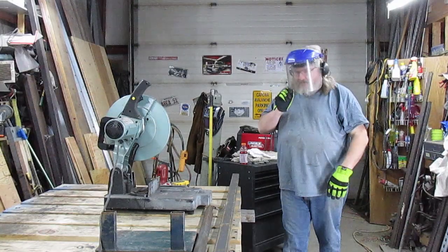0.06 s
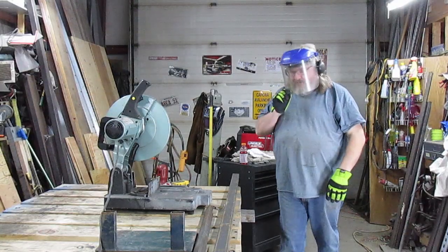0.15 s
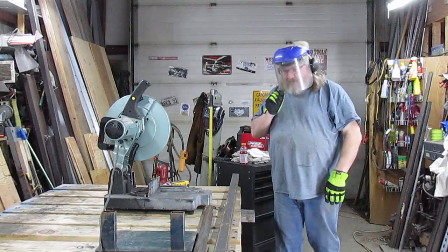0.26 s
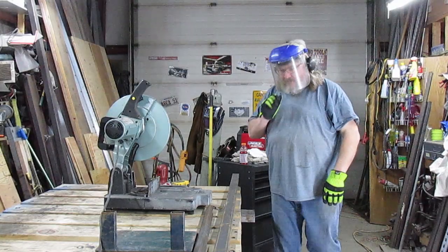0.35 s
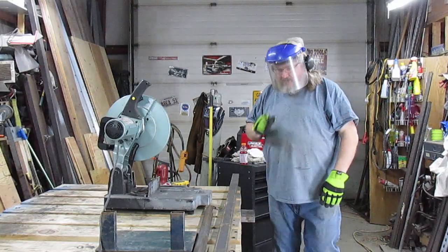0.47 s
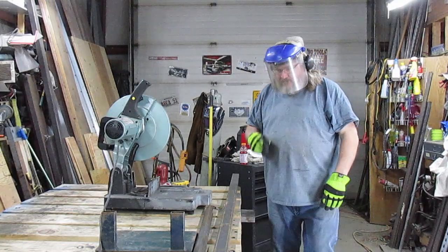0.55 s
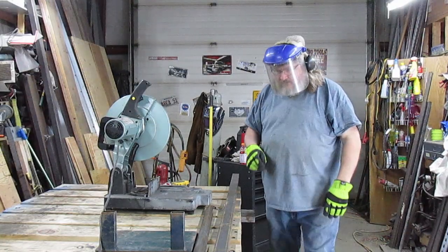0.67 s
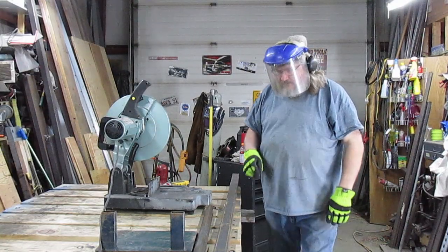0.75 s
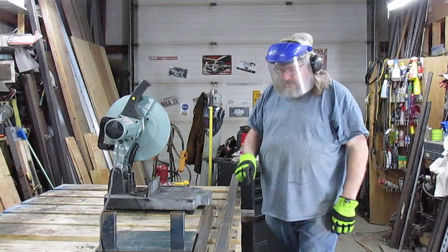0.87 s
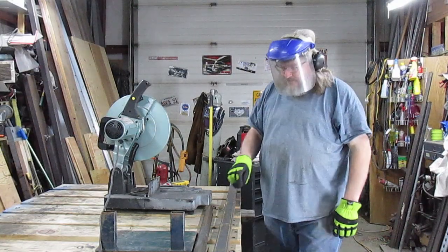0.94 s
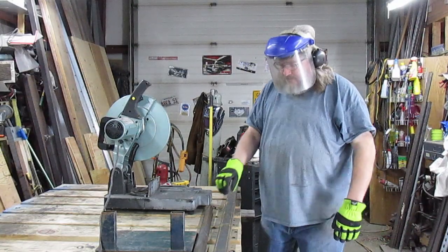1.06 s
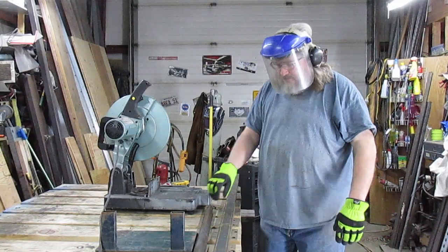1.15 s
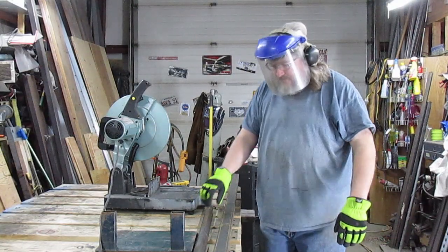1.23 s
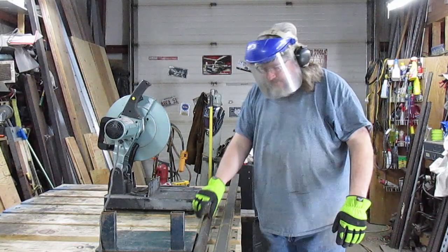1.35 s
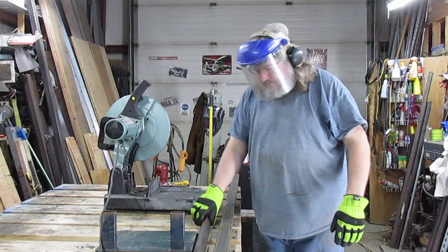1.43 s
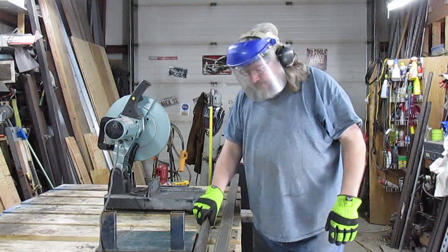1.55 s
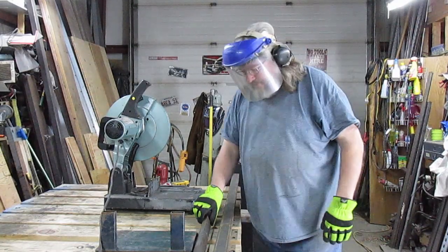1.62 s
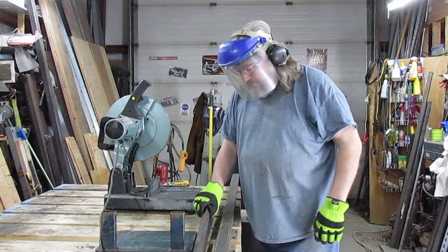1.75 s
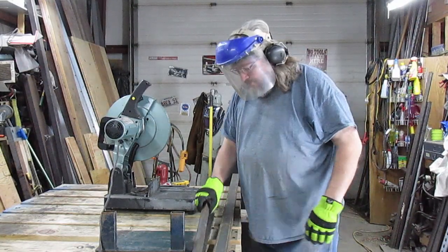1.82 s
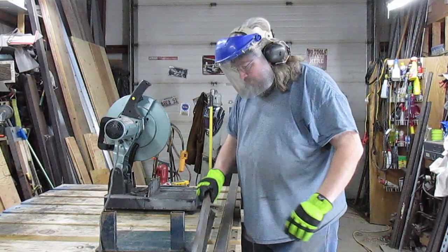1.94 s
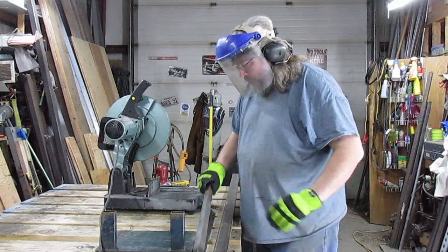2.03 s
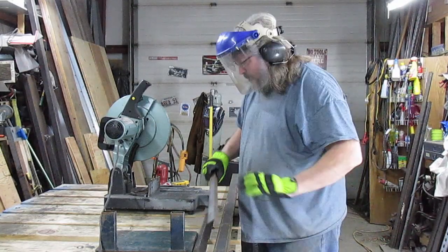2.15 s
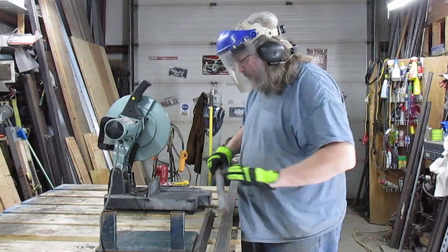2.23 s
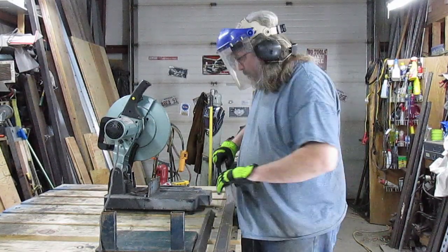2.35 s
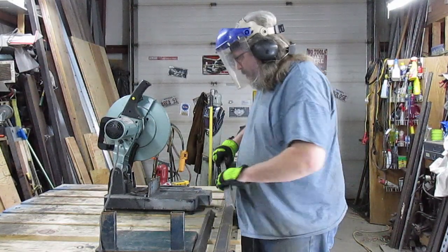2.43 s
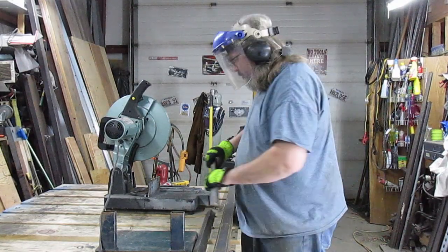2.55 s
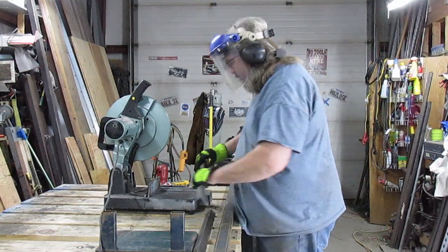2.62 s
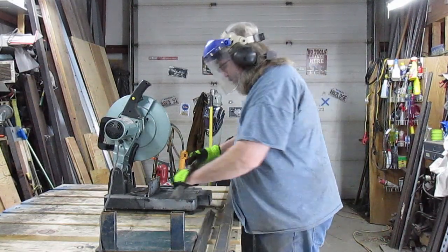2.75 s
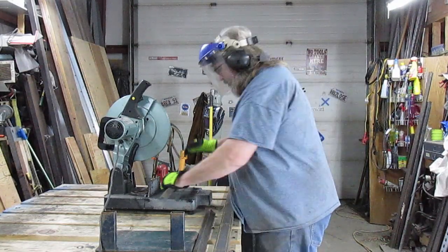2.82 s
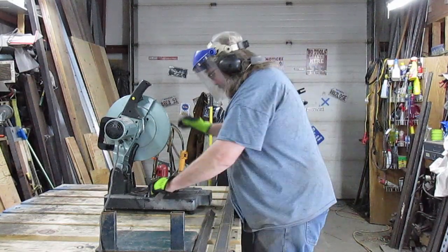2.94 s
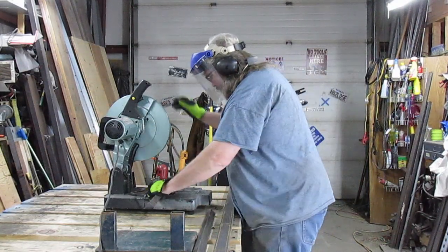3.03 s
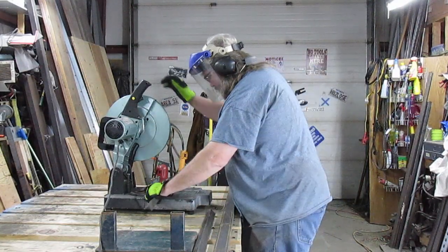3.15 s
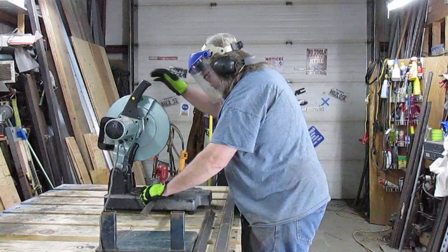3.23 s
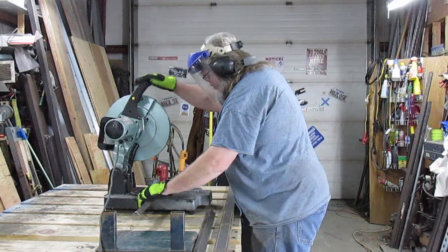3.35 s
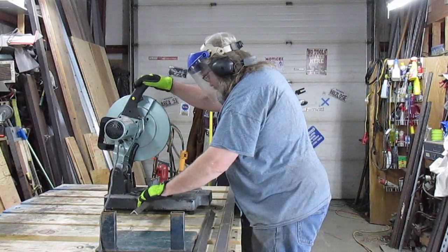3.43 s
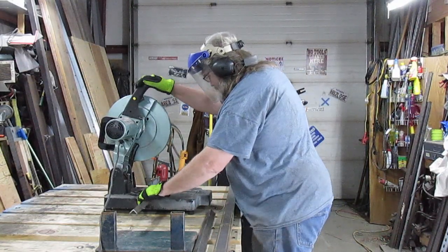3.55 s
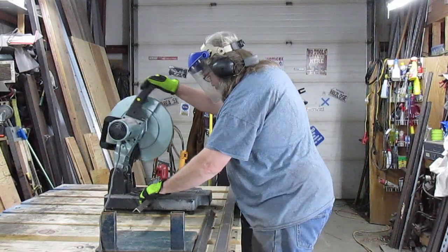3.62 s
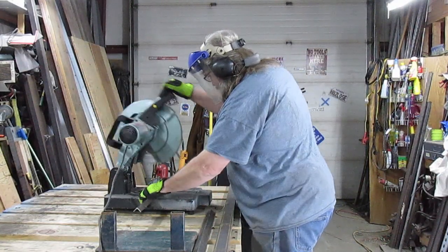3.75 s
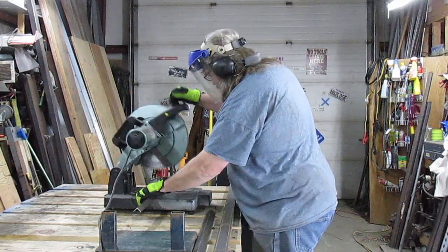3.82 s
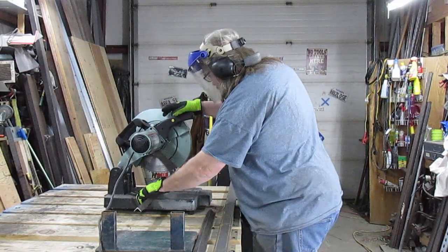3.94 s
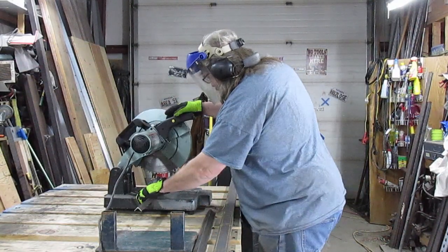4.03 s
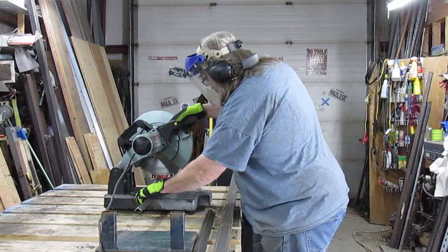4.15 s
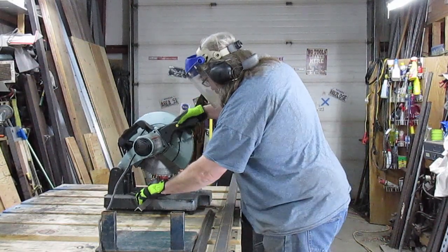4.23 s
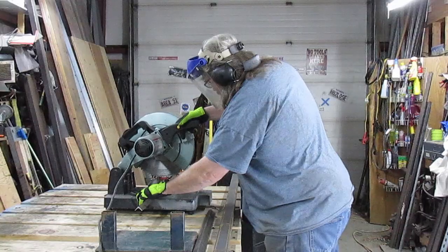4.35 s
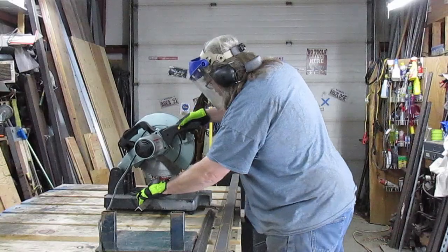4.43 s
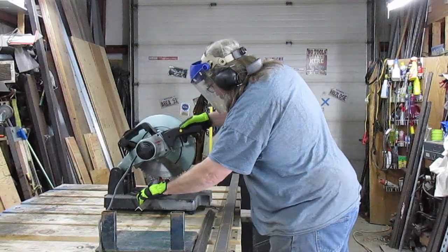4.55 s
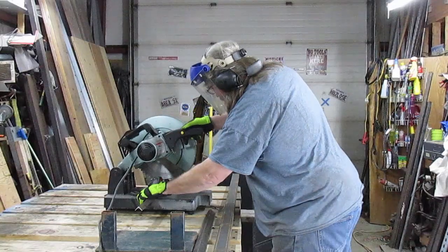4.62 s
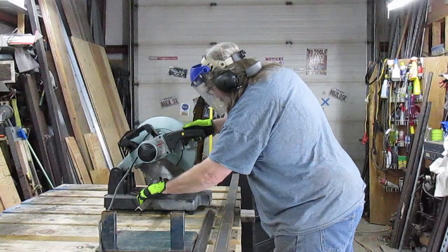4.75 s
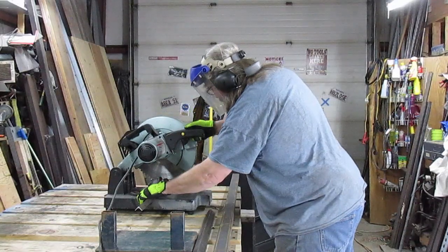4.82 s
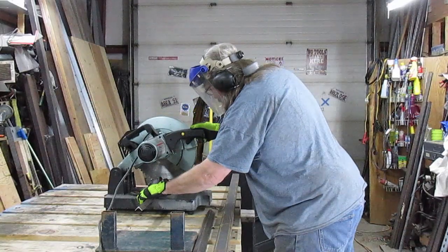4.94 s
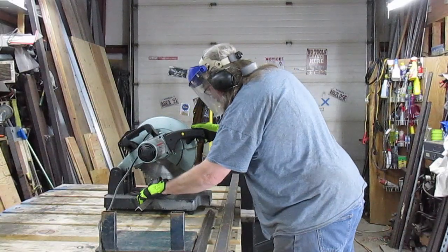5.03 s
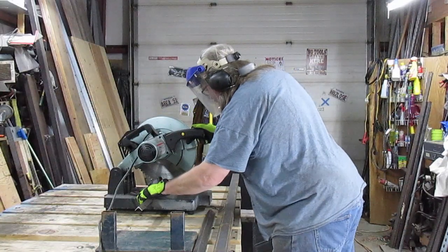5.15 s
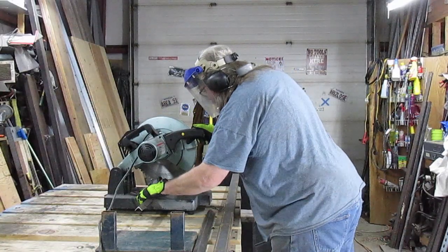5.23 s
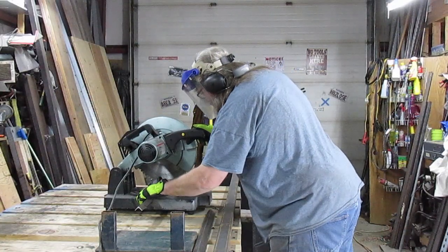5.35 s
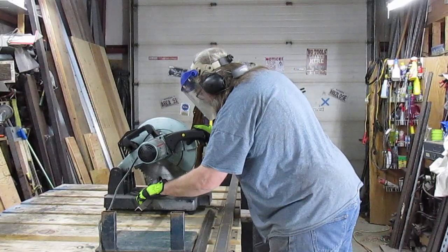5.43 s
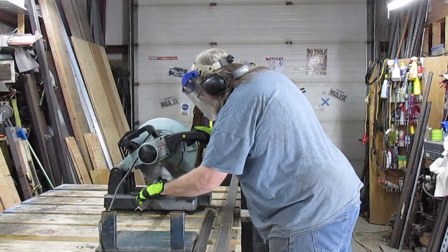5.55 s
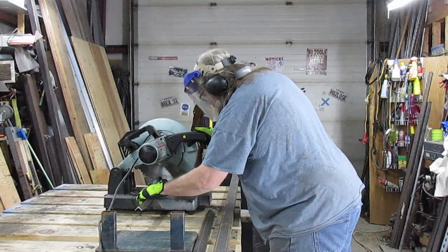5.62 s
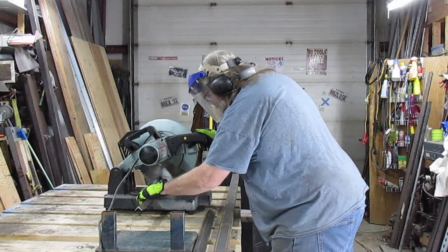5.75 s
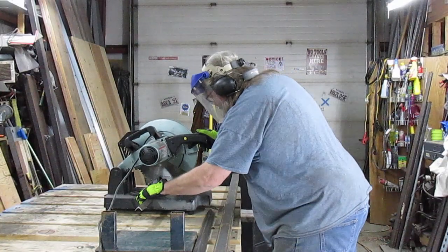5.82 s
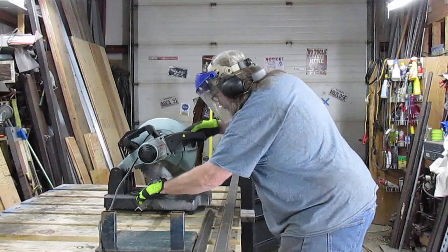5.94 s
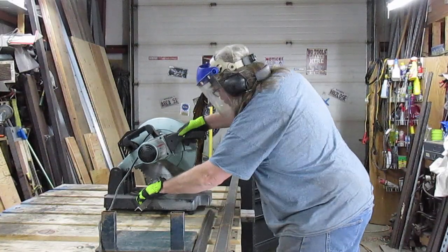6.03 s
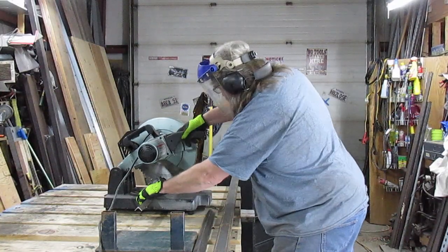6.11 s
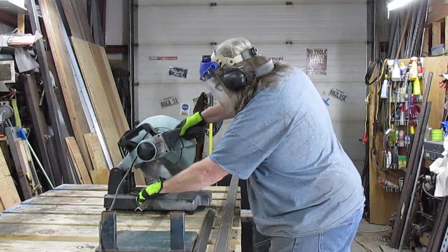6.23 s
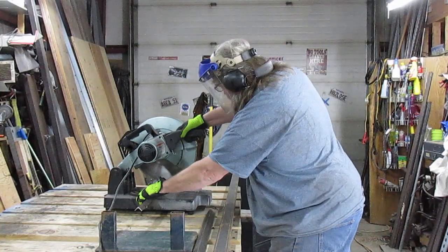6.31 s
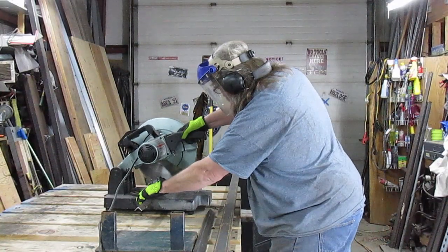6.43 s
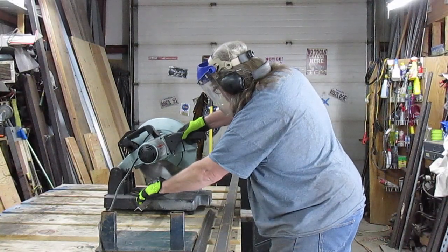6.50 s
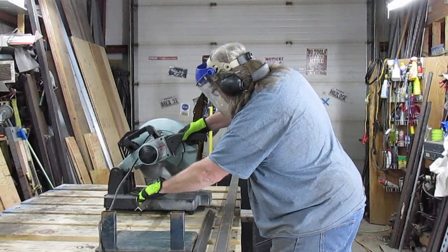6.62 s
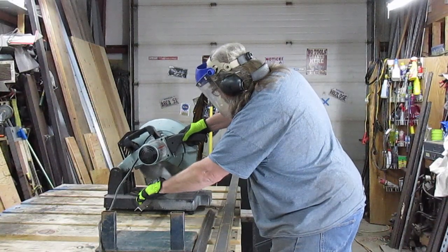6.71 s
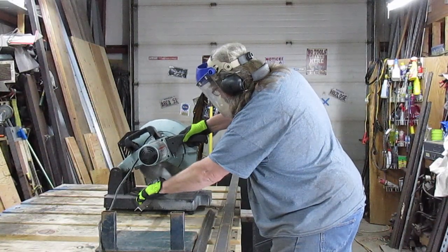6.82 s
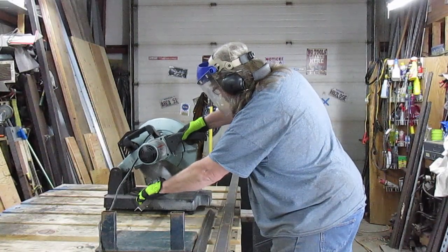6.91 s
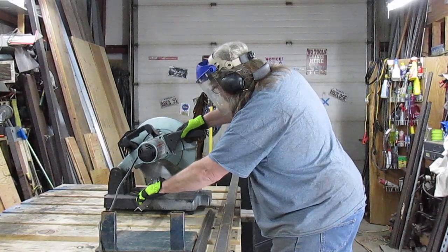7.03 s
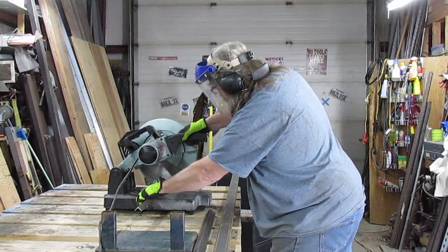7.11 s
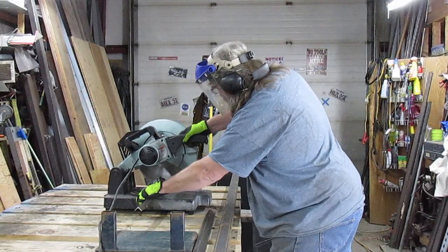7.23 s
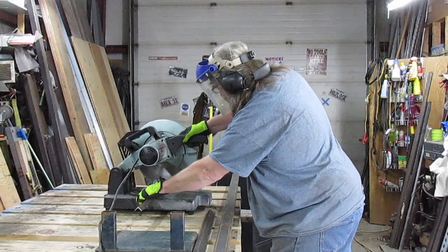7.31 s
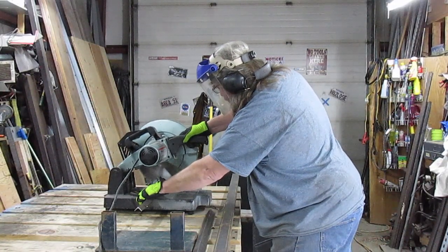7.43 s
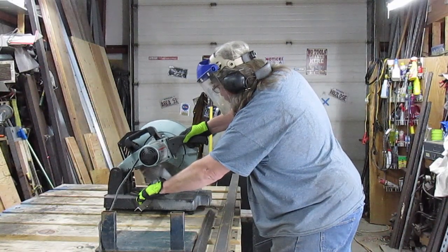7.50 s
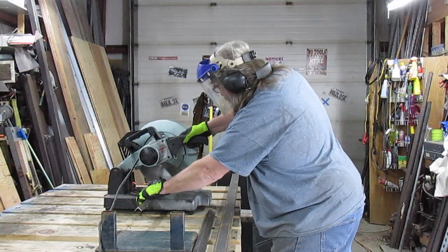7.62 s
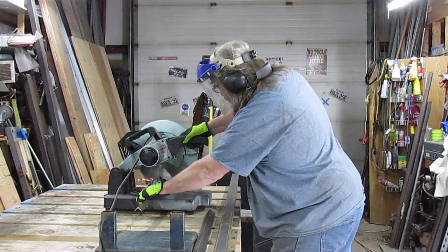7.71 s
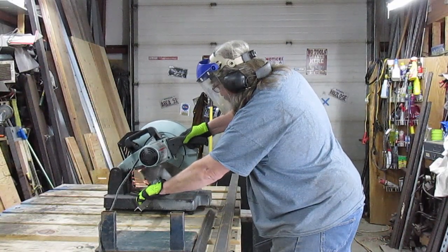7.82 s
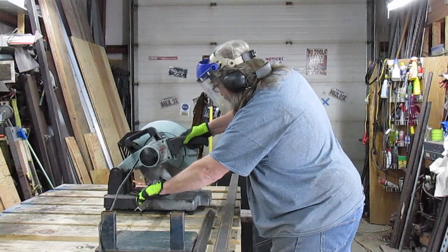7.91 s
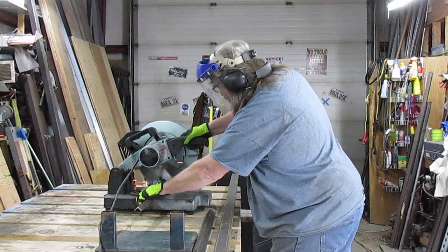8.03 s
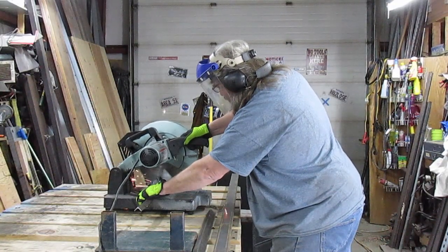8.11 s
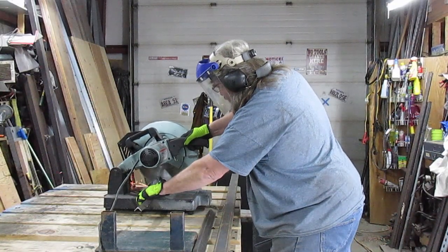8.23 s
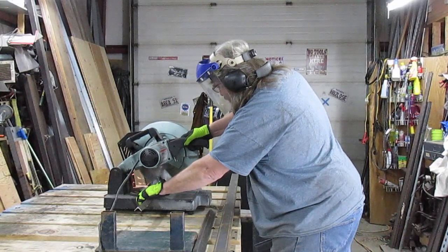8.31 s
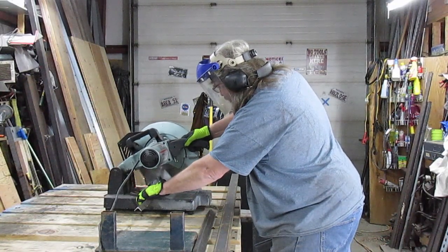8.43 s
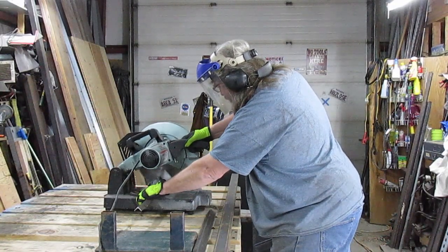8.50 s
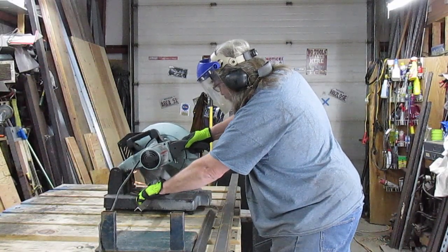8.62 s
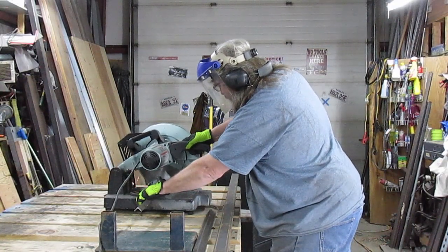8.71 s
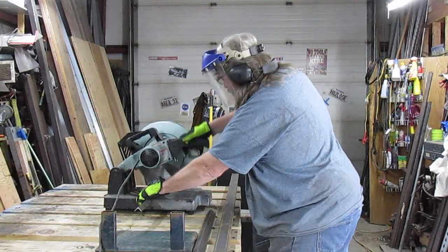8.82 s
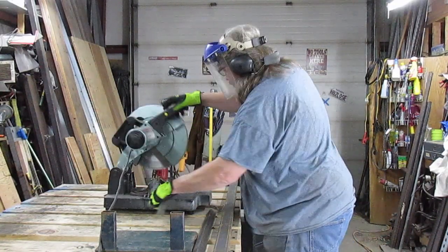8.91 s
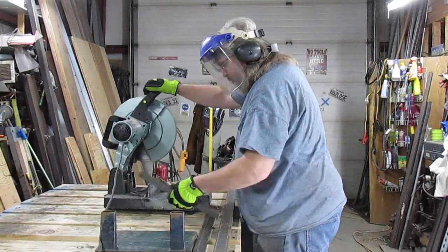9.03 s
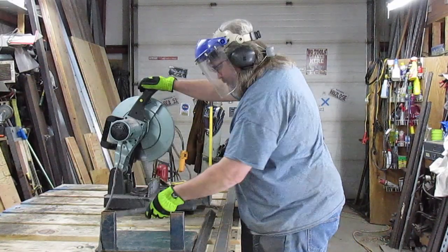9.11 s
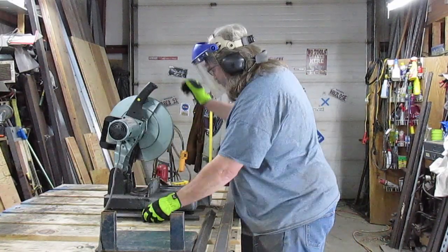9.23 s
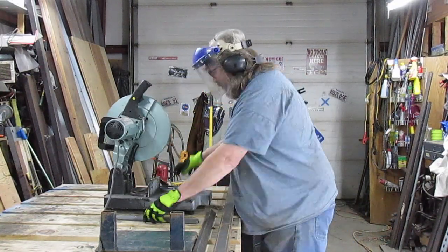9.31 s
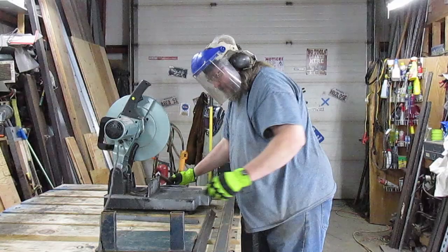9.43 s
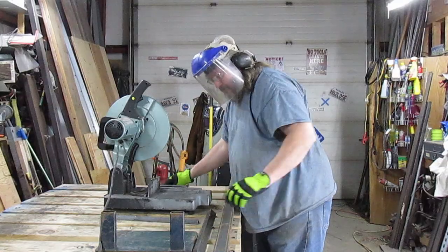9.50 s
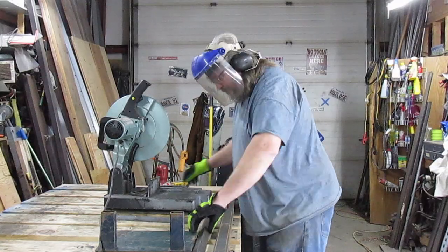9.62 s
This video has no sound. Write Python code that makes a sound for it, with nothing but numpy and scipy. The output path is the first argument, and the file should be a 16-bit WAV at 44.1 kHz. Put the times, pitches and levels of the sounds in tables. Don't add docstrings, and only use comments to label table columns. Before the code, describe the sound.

Small ticks, glove rustle and dull knocks come first, then a hard double clang of steel on a metal saw bed, a dragging scrape and stuttering spring creaks. An abrasive cut-off saw suddenly roars up, whining and fizzing as it bites into the bar with a harsh metallic ring. After release, the whine falls, the wheel hisses on, and a short piece drops. Modest room echo, stereo microphone a few metres off.

```python
import sys
import numpy as np
from scipy import signal
from scipy.fft import rfft, irfft
from scipy.io import wavfile
from scipy.ndimage import uniform_filter1d, map_coordinates

SR = 44100
rng = np.random.default_rng(int(sys.argv[2]) if len(sys.argv) > 2 else 0)


def volts_from_db(level):
    exponent = np.asarray(level, float) / 20
    return 10 ** exponent


def wav_out(sig):
    wavfile.write(sys.argv[1], SR, np.round(np.clip(np.atleast_2d(sig).T, -1, 1) * 32767).astype(np.int16))


N = 426006
T = np.arange(N) / SR
HZ = np.fft.rfftfreq(512, 1 / SR)
HANDS_OFF_S, TRIGGER_S = 6.17, 6.185
THROUGH_S, RELEASE_S = 8.745, 8.86


def evened(x):
    return x / np.sqrt(np.mean(x ** 2) + 1e-20)


def level_of(power):
    return 10 * np.log10(power + 1e-12)


def read(points, hz):
    f, value = np.transpose(points)
    return np.interp(np.log(hz + 1), np.log(f + 1), value)


def columns(rows):
    s, *rest = np.transpose(rows)
    return [np.interp(T, s, column) for column in rest]


def sides(pan_db):
    return volts_from_db(np.array([pan_db / 2, -pan_db / 2]))


def after(s, blur_s):
    return np.clip((T - s) / blur_s + .5, 0, 1)


def wander(per_s, channels=1):
    knots = rng.standard_normal((channels, 2000))
    at = T[::64] * per_s + 5
    return np.array([np.interp(T, T[::64], map_coordinates(k, [at], order=3)) for k in knots])


def strokes(rows):
    start, push, db, swell_db, fade = np.transpose(rows)[:, :, None]
    t = T[::32] - start
    level_db = db - swell_db * np.maximum(1 - t / push, 0) - fade * np.maximum(t - push, 0)
    power = volts_from_db(2 * level_db) * np.clip(t / 0.0044 + 1, 0, 1)
    return np.interp(T, T[::32], power.sum(0))


def hiss(spectrum, same, patchy_db, flicker_db):
    a, b, c, d, patches = rng.standard_normal((N // 128 + 5, 257, 5)).T
    flicker = evened(uniform_filter1d(uniform_filter1d(patches, size=120, axis=0), size=3, axis=1))
    patches = evened(uniform_filter1d(uniform_filter1d(patches, size=6, axis=0), size=24, axis=1))
    same = np.clip(same * np.ones(257), -1, 1)[:, None]
    left = a + 1j * b
    right = same * left + np.sqrt(1 - same ** 2) * (c + 1j * d)
    z = np.array([left, right])
    z *= volts_from_db(read(spectrum, HZ)[:, None] + patchy_db * patches + flicker_db * flicker)
    return evened(signal.istft(z, nperseg=512, noverlap=384)[1][:, :N])


def grit(spread_db, per_s, same):
    hit = rng.random((2, 2, N)) < per_s / SR
    a, b = rng.standard_normal((2, 2, N)) * hit
    size = volts_from_db(spread_db * np.minimum(rng.exponential(1, (2, N)), 4))
    return evened(size * (a + same * b[0]))


def ring(x, hz, width):
    r = np.exp(-np.pi * width / SR)
    return signal.lfilter([1 - r, 0, r - 1], [1, -2 * r * np.cos(2 * np.pi * hz / SR), r * r], x)


def strike(events, modes, tick, burst_s):
    t = np.arange(2000) / SR
    blows, ticks = np.zeros((2, 2, N + 2000))
    for s, db in events:
        noise = rng.standard_normal((3, len(t)))
        noise = volts_from_db(db) * (1.11 * noise[0] + 0.48 * noise[1:])
        blows[:, round(s * SR):][:, :len(t)] += noise * t / burst_s * np.exp(-t / burst_s)
        ticks[:, round(s * SR):][:, :len(t)] += noise * np.exp(-t / 0.0049)
    rung = sum(volts_from_db(db) * ring(blows, hz, 2.43 / t60) * t60 for hz, db, t60 in modes)
    return (78.0 * rung + tick * ring(ticks, 1850, 2200.0))[:, :N]


def chime(events, modes, rise_s, chatter_db=0, apart=1.24):
    t, out = np.arange(SR // 2) / SR, np.zeros((2, N + SR))
    hz, db, t60 = np.transpose(modes)[:, :, None]
    knot, part = np.divmod(t * 71, 1)
    knot = knot.astype(int)
    for s, blow_db, colour_hz in events:
        phase = 2 * np.pi * rng.random((len(modes), 1)) + apart * rng.standard_normal((2, len(modes), 1))
        knots = rng.standard_normal((len(modes), 200))
        flutter = knots[:, knot] * (1 - part) + knots[:, knot + 1] * part
        off_colour_db = 9 * np.log2(hz / colour_hz) ** 2
        size = volts_from_db(blow_db + db - off_colour_db - 60 * t / t60 + chatter_db * flutter)
        ringing = size * np.sin(2 * np.pi * hz * t + phase + 0.23 * chatter_db * flutter)
        out[:, round(s * SR):][:, :len(t)] += ringing.sum(1) * np.minimum(t / rise_s, 1)
    return out[:, :N]


def saw():
    load = columns(FEED)[1]
    on, through = after(TRIGGER_S + 0.002, 0.013) ** 2, after(THROUGH_S, 0.048)
    turns_per_s = 60 - 24 * load
    depth = np.clip((0.077 + 0.082 * load) * (1 - 0.87 * through), 0, 1)
    throb = 1 + depth * np.cos(2 * np.pi * np.cumsum(turns_per_s) / SR + 0.47 * wander(5.)[0])
    grains = grit(spread_db=3.5, per_s=6000, same=0.14) * throb
    rush = (motor_roar() + grit_fizz(load, through)) * throb
    bodies = drumming_bed(grains, through) + shuddering_bench(grains, load, through)
    return (rush + ringing_cut(grains, through) + bodies) * on


# (time [s], ring level [dB], load [0-1])
FEED = [
    (6.5, -47, 0),
    (7.2, -29, 0),
    (7.45, -20, 0.16),
    (7.68, -23, 0.38),
    (7.9, -27, .75),
    (8.25, -24, 0.95),
    (8.55, -20, .94),
    (8.75, -23.5, 1.09),
    (8.86, -35, .95),
]
# (frequency [Hz], width [Hz], level [dB], strongest time [s], duration [s])
CUT_MODES = [(1400, 53, -6, 8.2, 0.42), (1683, 74, -4.5, 7.86, 0.47), (2630, 99, -7, 8.1, 0.42),
             (3030, 200, -13, 8.1, 0.29), (4130, 60, -6, 8.3, .5), (3250, 25, -15, 8, 0.27),
             (7200, 43, -9, 7.2, 0.43), (8155, 77, -1, 8.4, 1), (8800, 68, -0.5, 8.55, 0.97),
             (9430, 55, -2.5, 8.35, 0.97), (10000, 150, -3, 8.7, 0.52), (11200, 60, -2, 6.9, 0.47)]


def ringing_cut(grains, through):
    ring_db = columns(FEED)[0] - 11.0 * through
    cut = 0
    for hz, width, db, s, lasting in CUT_MODES:
        depth_db = db - 4.4 * ((T - s) / lasting) ** 2
        cut = cut + volts_from_db(depth_db + 2.2 * wander(9., channels=2)) * evened(ring(grains, hz, width))
    return volts_from_db(ring_db) * 0.49 * cut


# (frequency [Hz], level per Hz [dB])
FIZZ = [(1760, -25.5), (3000, -3), (3670, -7), (4280, -6.5), (7720, -6), (9060, -3.5), (12700, -10),
        (15800, -23)]


def grit_fizz(load, through):
    cutting_db = -28.5 + 3 * after(6.8, 0.45) + 2 * load
    fading_db = -36.5 - 6.5 * (T - THROUGH_S)
    fizz_db = (1 - through) * cutting_db + through * fading_db
    fizz = volts_from_db(fizz_db + 1.5) * hiss(FIZZ, 0.017, patchy_db=1.5, flicker_db=1.83)
    wheel_hz = np.geomspace(2300, 12500, 22) * (1 + .03 * rng.standard_normal(22))
    return fizz + volts_from_db(fizz_db - 7.5) * flecks(FIZZ, wheel_hz)


# (time [s], roar level [dB])
MOTOR = [
    (6.19, -23.5),
    (6.3, -21),
    (6.86, -22),
    (6.9, -27.5),
    (7.11, -20.5),
    (7.27, -25.5),
    (8.71, -28.5),
    (8.76, -34),
    (9.66, -31),
]
# (frequency [Hz], level per Hz [dB])
ROAR = [(35, -94), (60, -64), (123, -56), (351, -12), (443, -16), (1020, -4), (1700, -4), (4420, -3.5),
        (5840, -10), (11500, -11.5), (15500, -30)]
# (frequency [Hz], width [Hz], level [dB])
GUARD = [(1010, 180, -7), (1410, 30, -7), (1750, 40, -7), (1958, 87, -6), (2640, 60, -5), (2990, 60, -5),
         (3243, 60, -4), (6170, 76, -9)]


def motor_roar():
    roar_db = columns(MOTOR)[0]
    roar = volts_from_db(roar_db + 0.4) * hiss(ROAR, 0.0075, patchy_db=1.5, flicker_db=1.3)
    return roar + volts_from_db(roar_db - 7.5) * flecks(ROAR, [hz for hz, width, db in GUARD])


def flecks(spectrum, modes_hz):
    start = round(HANDS_OFF_S * SR) // 64 * 64
    noise, out = rng.standard_normal((2, N - start)), np.zeros((2, N))
    for hz in modes_hz:
        knots = rng.standard_normal(400)
        flare = volts_from_db(4 * np.interp(T[start::64] * 14, np.arange(400), knots))
        drive = noise * np.repeat(flare, 64)[:N - start]
        out[:, start:] += volts_from_db(read(spectrum, hz)) * np.sqrt(hz) * ring(drive, hz, width=40)
    return out / np.std(out[:, start:])


# (start time [s], push [s], peak level [dB], swell during the push [dB], fade [dB/s])
JOLTS = [
    (6.195, 0.1, -28.5, -3, 300),
    (6.46, 0.08, -39.5, 9, 42),
    (7.71, 0.061, -36, 6, 68),
    (8.02, 0.061, -41.5, 7, 80),
    (8.36, 0.085, -39.5, 6, 120),
    (7.8, 0.056, -38, 0, 120),
    (9.2, 0.14, -44.5, 10, 75),
    (9.53, 0.054, -37, 9, 200),
]


def drumming_bed(grains, through):
    drum = evened(bed(grains + .5 * grains[0]) * volts_from_db(2.5 * wander(16.)))
    steady_db = -43.5 - 6 * through
    return volts_from_db(level_of(strokes(JOLTS) + volts_from_db(2 * steady_db)) + 2.5) * drum


def shuddering_bench(grains, load, through):
    shake = evened(ring(ring(grains + grains[0], 71, 93.0), 71, 93.0))
    return shake * volts_from_db(5.2 * wander(12.) - 61 + 10 * load - 18.5 * through)


# (time [s], level [dB])
SING = [(6.26, -45), (6.33, -33), (6.39, -35), (6.43, -31), (6.6, -28), (6.72, -30), (6.83, -25),
        (6.9, -37), (6.985, -27), (7.04, -34), (7.1, -27), (7.14, -23.5), (7.24, -33), (7.3, -37),
        (7.45, -35), (7.53, -29.5), (7.74, -37), (7.8, -45), (8.72, -48)]
# (time [s], level [dB])
COAST = [(8.86, -40), (8.92, -39.5), (8.965, -34), (9.04, -34), (9.08, -44), (9.15, -39), (9.19, -41),
         (9.24, -42), (9.36, -40), (9.45, -45), (9.6, -45)]
# (frequency [Hz], width [Hz], lift [dB])
HOUSING = [(3130, 50, 5), (3400, 40, 2), (3760, 83, 11), (4000, 27, 10), (4100, 25, 5), (4393, 29, 8),
           (4474, 39, 6)]
# (multiple of gear mesh, level to mesh [dB], start time [s], end time [s])
OVERTONES = [
    (2, -4, 6.55, 6.85),
    (2, -1, 6.96, 7.11),
    (2, -3, 7.3, 7.6),
    (2.681, -4, 6.5, 6.72),
    (2.6, 5, 6.26, 6.31),
    (4.15, 8, 6.265, 6.295),
    (2, -5, 9.08, 9.3),
]


def whine():
    load, off = columns(FEED)[1], after(RELEASE_S, 0.06)
    running, coasting = np.maximum(T - TRIGGER_S, 0), np.maximum(T - RELEASE_S, 0)
    hz = 4620 - 3173 * np.exp(-running / .195)
    hz = hz - 550 * load - 2380 * coasting * (1 - 0.15 * coasting)
    hz = hz + 34.87 * load ** 2 * (1 - off) * wander(7.)[0]
    db = (1 - off) * columns(SING)[0] + off * columns(COAST)[0]
    housing_db = sum(lift_db * np.exp(-((hz - f) / width) ** 2) * (1 - off) for f, width, lift_db in HOUSING)
    turns = np.cumsum(hz) / SR
    out = np.zeros((2, N))
    for multiple, rel_db, start, until in [(1, 0, 0, 20)] + OVERTONES:
        outside_s = np.maximum(np.maximum(T - until, start - T), 0)
        line_db = db + rel_db - 350. * outside_s + housing_db * (multiple == 1)
        waver = 0.3 * wander(11.0, channels=2) + .7 * wander(9.) + 0.25 * wander(120., channels=2)
        waver = waver + 0.5 * load * (1 - off) * wander(70.)
        size = volts_from_db(line_db - 3.5 + 1.8 * wander(25., channels=2) + 2.4 * wander(30.))
        out += size * np.sqrt(2) * np.sin(2 * np.pi * multiple * turns + waver)
    return out * after(TRIGGER_S + .05, .04) + squeal()


# (start time [s], push [s], peak level [dB], swell [dB], fade [dB/s])
SQUEAL = [
    (8.2, 0.2, -34.5, 3.5, 150),
]


def squeal():
    tone = np.sin(2 * np.pi * 1240 * T + .35 * wander(16.0, channels=2))
    return np.sqrt(2 * strokes(SQUEAL)) * tone * volts_from_db(1.5 * wander(23.0, channels=2))


# (frequency [Hz], width [Hz], level [dB])
BED = [(441, 22, 7), (477, 43, 7.5), (526.5, 18, 4.5), (681, 25.2, -7)]


def bed(drive):
    return sum(volts_from_db(db) * ring(drive, hz, width) / np.sqrt(width) for hz, width, db in BED)


# (frequency [Hz], level [dB], time to fall 60 dB [s])
BAR = [(1372, -7, 0.2), (1690, 0, 0.14), (1915, -4, 0.39), (2566, 0, 0.32), (2777, -13, 0.3),
       (3370, -3.5, 0.15), (4070, -6, 0.19), (4940, -5, 0.47), (5300, -18.5, 0.26), (5400, -23, 0.39),
       (5900, -24, 0.25), (6245, -9, 0.45), (3720, -8.5, .4), (7350, -15, 0.19), (7700, -10, 0.29),
       (7740, -10.5, 0.295), (8210, -16, 0.52), (8580, -6, 0.26), (9300, -8.5, 0.3), (10350, -9, 0.24)]


def bar(drive, damping):
    out = 0
    for (hz, db, t60), lean in zip(BAR, rng.uniform(-1, 1, len(BAR))):
        mode = ring(drive, hz, damping / t60) * np.sqrt(t60 / 0.21)
        out = out + volts_from_db(db) * sides(19.0 * lean)[:, None] * mode
    return out


# (time [s], peak level [dB], colour centre [Hz], left-right [dB], bar ring level [dB])
KNOCKS = [(0.638, -19, 3200, -6, -34), (1.277, -37, 3520, -4.0, -18), (1.837, -31, 4470, -4, -18),
          (1.857, -21, 2050, -4, -15), (3.059, -34, 3160, -15, -10), (3.09, -14, 4500, 4, -31),
          (3.221, -24, 3960, -1.0, -8), (3.255, -11, 3300, 0, -11), (3.873, -22.5, 3070, -1, -28),
          (4.082, -24.5, 1780, 0, -7), (4.523, -29.5, 2550, 0, -12), (6.195, -14.5, 5540, 4, -18),
          (9.579, -23, 2570, 0.5, -10)]
# (time [s], peak level [dB], colour centre [Hz], left-right [dB])
TICKS = [(0.004, -28, 10000, -4), (0.243, -41, 3800, -13), (0.55, -45.5, 2630, 7), (0.613, -42, 2830, -2.5),
         (0.628, -40, 2820, 2), (0.778, -34, 2280, -8), (0.904, -46, 2500, -3), (0.955, -34, 4640, -6),
         (1.027, -28, 8000, -5), (2.025, -46, 3750, -11), (2.323, -37, 3530, 1), (2.609, -34.5, 2470, -4),
         (2.932, -38, 5500, -4.0), (3.6, -22.5, 2000, -1), (3.65, -26, 1890, 0), (4.481, -44, 1498, -6),
         (4.668, -37, 1490, -2), (6.014, -42, 1000, 0), (4.744, -43, 3300, 0), (9.362, -31, 2950, 7)]


def knocks():
    t = np.arange(SR // 2) / SR
    dry, blows = np.zeros((2, 2, N + len(t)))
    rows = [(*row, -20.5, 0.033) for row in TICKS] + [(*row, 0.065) for row in KNOCKS]
    for s, db, hz, pan_db, ring_db, t60 in rows:
        noise = rng.standard_normal((3, len(t)))
        noise = 1.23 * noise[0] + 0.78 * noise[1:]
        colour = evened(ring(noise, hz, 0.43 * hz)) + 0.05 * evened(ring(noise, 6500, 7030.0))
        shape = 0.49 * np.exp(-t / 0.00082) + 0.5 * volts_from_db(-60 * t / max(t60, .005))
        shape = shape * np.minimum(t / 0.00013, 1)
        at = slice(round(s * SR), round(s * SR) + len(t))
        dry[:, at] += volts_from_db(db) * sides(pan_db)[:, None] * colour * shape
        blows[:, at] += volts_from_db(db + ring_db) * noise * np.exp(-t / 0.0072)
    return dry[:, :N] + 7.2 * bar(blows[:, :N], 3.3) + 7.7 * bed(blows[:, :N])


# (start time [s], push [s], peak level [dB], swell during the push [dB], fade [dB/s])
GLOVES = [(0.0, 0.024, -44.5, 12, 79), (0.235, 0.022, -40.5, 15, 113), (0.638, 0.0083, -28.5, 18, 116),
          (0.93, 0.097, -50, 7, 140), (1.277, 0.067, -30, 3.5, 231), (1.45, .15, -49, 5.5, 72),
          (1.838, 0.0047, -31.5, 8, 198), (1.93, 0.09, -51, 13, 97), (2.17, 0.031, -51, -2, 129),
          (2.32, .01, -53.5, 3, 54), (2.585, .022, -50, 17, 76), (2.84, 0.25, -30, 34.5, 400),
          (3.09, 0.0032, -16, 4, 152), (3.255, 0.0029, -16, 7.5, 137), (3.52, 0.13, -37.5, 6.5, 76),
          (3.873, .004, -45.5, 3, 49), (4.08, 0.28, -36, 5.5, 173), (4.82, 0.086, -57, 15, 94),
          (5.95, .06, -51.5, 23, 148)]
# (start time [s], push [s], peak level [dB], swell during the push [dB], fade [dB/s])
DRAGS = [(1.7, 0.092, -33, 11, 300), (1.84, 0.065, -35, 2, 205), (2.17, 0.038, -61, 3, 120),
         (3.09, 0.0029, -31.5, 11, 78), (3.215, 0.024, -23.5, 3, 300), (3.256, 0.044, -25, 4, 88),
         (3.56, 0.14, -35, 1.5, 84), (3.873, .004, -40.5, -2, 57), (4.085, 0.23, -43.5, -2.5, 170),
         (4.36, 0.045, -49.5, 11, 56), (4.52, .02, -44, -0.5, 62), (5.97, 0.047, -47.5, 24, 204)]
# (frequency [Hz], level per Hz [dB])
SCUFF = [(59, -58), (100, -1.5), (447, -14), (879, -17), (1260, -7), (1370, -4), (3120, 1.5), (10200, -0.5),
         (15500, -14.5)]


def rubbing():
    gloves = strokes(GLOVES) + volts_from_db(2 * -63.5)
    drags, on = strokes(DRAGS), 1 - after(HANDS_OFF_S, .01)
    rubbed = gloves * volts_from_db(2 * -9)
    scuff_db, dull_db = level_of(gloves), level_of(rubbed + drags)
    steely = drags / (rubbed + drags)
    drag_ring = 0.71 - 0.44 * after(3.54, 0.13)
    share = np.clip(0.054 + (drag_ring - 0.054) * steely, 0, 1)
    scuff = volts_from_db(scuff_db + 0.5) * hiss(SCUFF, 0.077, patchy_db=1.0, flicker_db=2.0)
    dull_spectrum = [(350, -15.5), (800, -4.0), (1300, -3.0), (2600, -6.5), (6000, -28.0)]
    dull = volts_from_db(dull_db) * hiss(dull_spectrum, 0.77, patchy_db=3.5, flicker_db=0.5)
    grains = grit(spread_db=3., per_s=1500, same=1.0)
    soft = ring(grains, 1830, 1600.0)
    hard = grains - soft
    force = volts_from_db(dull_db) * soft / np.std(bar(soft, 22.0))
    force = force + volts_from_db(scuff_db - 0.5) * hard / np.std(bar(hard, 7.6))
    loose = 1 - after(2.8, .1)
    off_bed_db = -4.5 * loose
    steel = bar(force * on * np.sqrt(share), 6.6) * volts_from_db(off_bed_db)
    bed_db = level_of(gloves * volts_from_db(2 * -24) + drags * volts_from_db(2 * -6.5))
    boom = bed(volts_from_db(bed_db + 1.4 + off_bed_db) * on * grains) / np.std(bed(grains))
    boom = boom + volts_from_db(-3) * np.sqrt(drags) * loose * bench(grains) + scrape(grains)
    return ((scuff + dull) * on * np.sqrt(1 - share) + steel) * sides(-2.5 + 1.5 * steely) + boom


# (frequency [Hz], width [Hz], level [dB])
BENCH = [(426, 65, -4.5), (960, 68, 0.5), (1170, 21, -3), (1878, 23, 4), (2575, 28, -5), (2960, 52, -17),
         (3230, 110, -8), (4500, 67, -8), (5630, 30, -16), (5980, 45, -21)]


def bench(grains):
    return evened(sum(volts_from_db(db) * evened(ring(grains, hz, width)) for hz, width, db in BENCH))


# (start time [s], push [s], peak level [dB], swell [dB], fade [dB/s])
SCRAPE = [
    (4.12, 0.24, -32.5, 9, 200),
]


def scrape(grains):
    rough = rng.standard_normal((2, N)) + 0.34 * grains
    return np.sqrt(strokes(SCRAPE)) * evened(ring(rough, 2630, 1700))


# (time [s], level [dB])
BOOMS = [
    (1.9, -37),
    (3.092, -28),
    (3.6, -38),
    (3.71, -35.5),
    (3.875, -28),
    (4.524, -50),
]
# (time [s], level [dB], colour [Hz])
CLANGS = [
    (3.091, -33, 4800),
    (3.222, -34, 4200),
    (3.259, -18, 3430),
    (3.283, -34, 2600),
    (3.306, -23.5, 1750),
]
# (frequency [Hz], level [dB], time to fall 60 dB [s])
CLANG = [(1357, -4, .2), (1698, 0, .26), (1913, -4, .24), (2612, -6, .3), (2794, -5, .22), (3372, 0, .17),
         (4156, -10, .22), (4906, -9, .28), (5240, -13, .28), (5615, -8, .3), (5835, -11, .22),
         (6246, -4, .25), (6826, -12, .35)]
# (time [s], level [dB], colour [Hz])
PING = [
    (1.86, -52.5, 3600),
]
# (frequency [Hz], level [dB], time to fall 60 dB [s])
ROD = [(3660, 0, 1)]
# (time [s], level [dB], colour [Hz])
TAPS = [
    (3.873, -33, 3200),
]
# (frequency [Hz], level [dB], time to fall 60 dB [s])
FENCE = [(2600, -1, .06), (2950, -0.5, .13), (3800, -2, .08), (4200, -14, 0.087)]
# (time [s], level [dB], colour [Hz])
BUMPS = [
    (0.64, -55, 250),
    (1.86, -45.5, 340),
    (3.09, -36, 191),
    (3.256, -45, 340),
    (3.875, -45, 251),
    (9.27, -56, 219),
]
# (frequency [Hz], level [dB], time to fall 60 dB [s])
LEGS = [(183.3, -3.5, 0.44), (225, -4, 0.23), (341, -2, 0.47)]


def landings():
    boom = strike(BOOMS, [(hz, db, .4) for hz, width, db in BED], tick=0, burst_s=0.0041)
    clang = chime(CLANGS, CLANG, rise_s=0.0033, chatter_db=3., apart=.6)
    fence = chime(TAPS, FENCE, rise_s=.001, chatter_db=3.)
    rest = chime(BUMPS, LEGS, rise_s=0.0123) + chime(PING, ROD, rise_s=.003)
    return 1.26 * (boom + clang + fence + rest)


# (time [s], level [dB])
SLIPS = [
    (5.396, -33.5),
    (5.459, -36),
    (5.489, -38),
    (5.538, -32.5),
    (5.588, -31.5),
    (5.687, -33.5),
    (5.767, -33),
    (5.839, -35),
]
# (frequency [Hz], level [dB], time to fall 60 dB [s])
SNAP = [(2330, -1.5, 0.033), (2660, -0.5, 0.036), (3420, -11, .03), (4300, -3, .025), (5400, -10, .025)]
# (frequency [Hz], level [dB], time to fall 60 dB [s])
ARM = [(940, -7.5, 0.15), (1056, -5.5, 0.14), (1148, -1, 0.06), (1250, -2.5, 0.086), (1400, -4, 0.12),
       (1480, -1, 0.064), (2050, -10, 0.053), (2290, -9, 0.05), (2570, -10, 0.03)]
# (time [s], level [dB])
THUDS = [
    (5.41, -55),
    (5.5, -45),
    (5.6, -48.5),
    (5.73, -47.5),
    (5.81, -52),
]
# (time [s], level [dB], colour [Hz])
NUDGES = [
    (4.526, -39, 1000),
    (4.547, -43, 1300),
    (4.587, -46, 1400),
    (4.628, -46, 1350),
    (4.668, -46, 1350),
    (4.685, -49, 1300),
    (6.196, -25.5, 1150),
    (6.26, -28, 1400),
]


def pivot():
    creak = strike(SLIPS, ARM, tick=0.71, burst_s=0.0095)
    snap = chime([(s, db - 10, 2600) for s, db in SLIPS], SNAP, rise_s=.0006)
    thuds = strike(THUDS, [(hz, db, .15) for hz, width, db in BED], tick=0, burst_s=0.016)
    return creak + snap + 1.26 * thuds + chime(NUDGES, ARM, rise_s=.003, chatter_db=2.0, apart=.6)


# (time [s], level [dB], colour [Hz])
CLINK = [
    (9.269, -24.5, 2600),
]
# (frequency [Hz], level [dB], time to fall 60 dB [s])
OFFCUT = [(1836, 2, 0.063), (3430, -2, 0.14)]


def offcut():
    return chime(CLINK, OFFCUT, rise_s=0.0028, apart=.3)


# (frequency [Hz], time to fall 60 dB [s])
WALLS = [(200, 0.297), (1000, 0.356), (4000, 0.4), (12000, 0.27)]


def walls(x):
    taps = np.zeros((2, 30000))
    at = np.arange(300, 29980, 20) + rng.integers(0, 20, (2, 1484))
    np.put_along_axis(taps, at, rng.choice([-1., 1.], at.shape), axis=1)
    hz, t, z = signal.stft(taps, SR, nperseg=256)
    fading = z * volts_from_db(-60 * t / read(WALLS, hz)[:, None])
    tail = signal.istft(fading, SR, nperseg=256)[1]
    return signal.fftconvolve(x, tail / np.linalg.norm(tail[0]), axes=1)[:, :N]


# (frequency [Hz], level per Hz [dB])
ROOM_TONE = [(12, -50), (20, -12), (126, -10), (240, -13.5), (375, -17), (431, -16), (1390, -23),
             (1790, -23), (2000, -26.5), (6470, -38.5), (8550, -27), (10100, -26.5), (15800, -36)]
# (frequency [Hz], likeness [0-1])
SAME = [(60, 1), (240, 0.79), (950, 0.18), (3770, 0.164), (15000, 0.25)]
# (frequency [Hz], width [Hz], level [dB])
HUM = [(40, 41, -11.5), (123, 52, -8), (133, 5, -17), (184, 3, -18), (237, 3.5, -9.5), (8500, 280, -7.5),
       (8520, 30, -10)]
# (start time [s], push [s], peak level [dB], swell [dB], fade [dB/s])
DRONE = [
    (0, 0.68, -63.5, 0, 49),
]


def room_tone():
    noise = rng.standard_normal((3, N))
    noise = 0.63 * noise[0] + noise[1:]
    hum = sum(volts_from_db(db + 1.6 * wander(3.06)) * evened(ring(noise, hz, width)) for hz, width, db in HUM)
    air = hiss(ROOM_TONE, read(SAME, HZ), patchy_db=1.3, flicker_db=1.5)
    return volts_from_db(-59.5) * (air + hum) + np.sqrt(strokes(DRONE)) * evened(ring(noise, 600, 90.))


def ducking(loud):
    power = signal.lfilter([1 / 45000.0], [1, 1 / 28000.0 - 1], (loud ** 2).mean(0))
    fall = T * 25.
    held_db = np.maximum.accumulate(level_of(power) + fall) - fall
    return volts_from_db(-1.6 * np.maximum(held_db + 34.5, 0))


# (frequency [Hz], left-right [dB])
TILT = [(60, 10), (180, -1.5), (550, 0.5), (1650, -1.5), (4970, -2), (15000, 3.5)]


def scene():
    hits = knocks() + landings() + pivot() + offcut()
    machine = saw() + whine()
    spectrum = rfft(machine) * sides(read(TILT, np.fft.rfftfreq(N, 1 / SR)))
    near = hits + volts_from_db(-8.5) * walls(hits) + rubbing() + irfft(spectrum, N)
    near = signal.sosfilt(signal.butter(4, 160., "high", fs=SR, output="sos"), near)
    return near + room_tone() * ducking(machine)


def band_limit(x):
    return signal.sosfilt(signal.butter(12, 16310, fs=SR, output="sos"), x)


def record(dry):
    notched = dry - .9 * signal.filtfilt(*signal.iirpeak(7900, 50., SR), dry)
    lowpass = signal.firwin(511, 15900, window=("kaiser", 9), fs=SR)
    limited = signal.oaconvolve(notched, lowpass[None], "same")
    return band_limit(limited)


dry = scene()
out = record(dry)
wav_out(out)
```